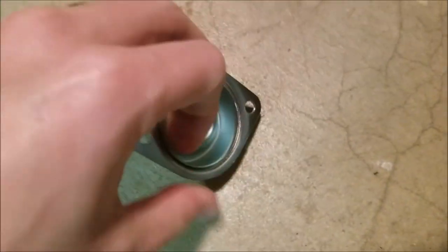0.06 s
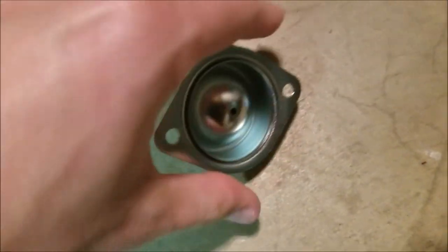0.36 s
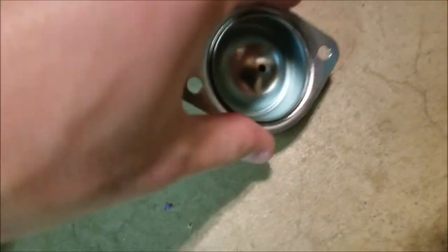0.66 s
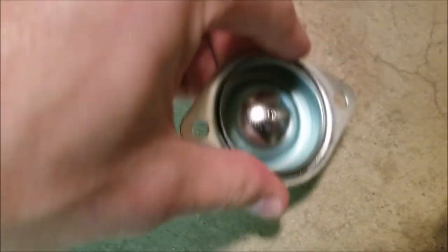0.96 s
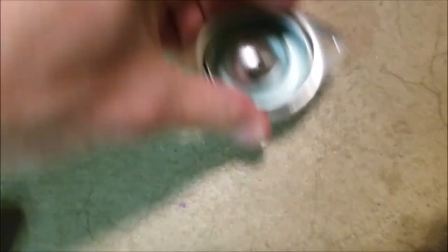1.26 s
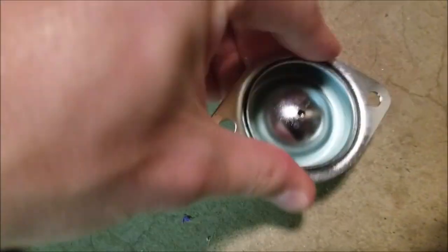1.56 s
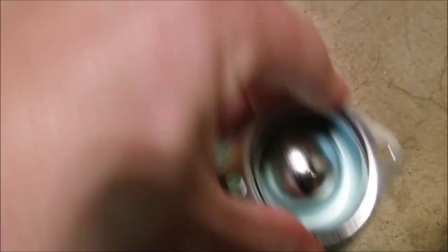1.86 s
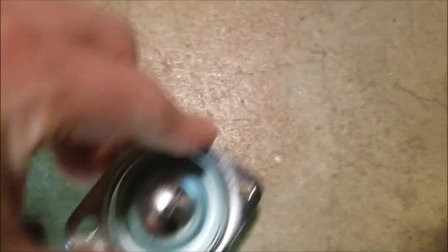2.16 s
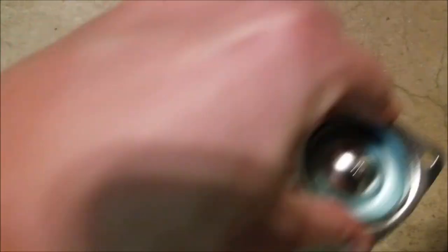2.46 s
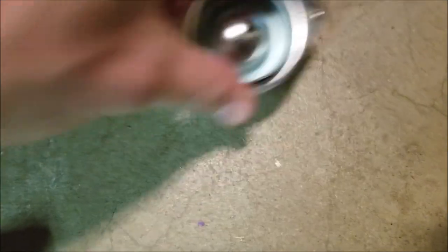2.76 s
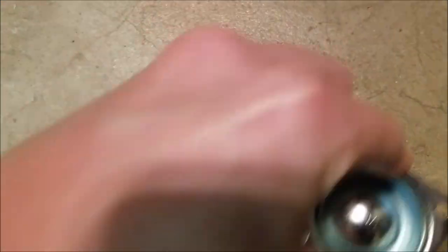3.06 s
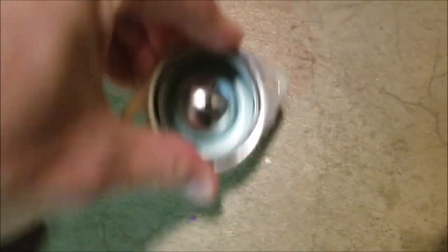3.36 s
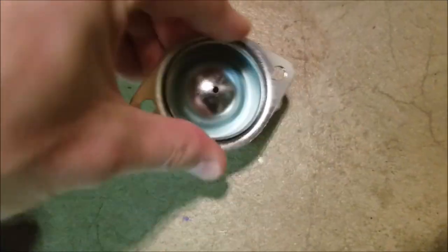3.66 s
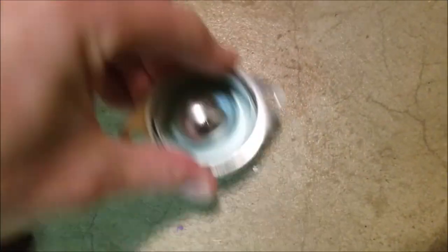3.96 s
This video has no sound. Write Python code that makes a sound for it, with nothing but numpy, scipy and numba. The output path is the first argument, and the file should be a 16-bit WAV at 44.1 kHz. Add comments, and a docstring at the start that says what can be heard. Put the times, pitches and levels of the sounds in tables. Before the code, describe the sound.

Gritty rolling and chattering of a steel ball caster pushed by hand across a concrete floor.

```python
"""Ball transfer unit on concrete

A steel ball transfer unit is pushed to and fro by hand over rough concrete, close up in a bare room.
Grit ticks through the pressed housing, the big ball chatters near 2 kHz and the small bearing balls
fizz in their cup. At pits and turns the ball knocks against its seat in a short burst of bounces.
Room rumble and a mains hum lie underneath."""
import sys
import numpy as np
from scipy import signal
from scipy.fft import rfft, irfft, next_fast_len
from scipy.io import wavfile
from numba import njit

SR = 44100
rng = np.random.default_rng(int(sys.argv[2]) if len(sys.argv) > 2 else 0)


def waveform_to_disk(signal):
    """Save audio, clipped to [-1, 1], as 16-bit WAV at the path in sys.argv[1]."""
    frames = np.transpose(np.atleast_2d(signal))
    scaled = np.clip(frames, -1, 1) * 32767
    samples = np.round(scaled).astype(np.int16)
    wavfile.write(sys.argv[1], SR, samples)


N = 176400
T = np.arange(N) / SR
FFT_SIZE = next_fast_len(2 * N, real=True)
HZ = np.arange(FFT_SIZE // 2 + 1) * SR / FFT_SIZE
BALL_HZ, BALL_LAG_S, HOUSING_LAG_S = 2170, 0.00008, 0.00004
GRIT_PER_S, GRIT_SPREAD_DB = 1200, 6
BEARING_PER_S, BEARING_SPREAD_DB = 1100, 3.5


def amp(db):
    return 10 ** (np.asarray(db) / 20)


def unit_rms(x):
    return x / np.sqrt(np.mean(x ** 2))


def unit_power(response):
    return response / np.sqrt(np.mean(abs(response) ** 2))


def pan(left_db):
    return amp(np.array([[left_db], [-left_db]]) / 2)


def right_lag(seconds):
    return np.exp(-2j * np.pi * HZ * np.array([[0], [seconds]]))


def through(x, response):
    """Filter by a frequency response."""
    return irfft(rfft(x, FFT_SIZE) * response, FFT_SIZE)[..., :N]


def colour(points):
    """Minimum-phase response of an EQ curve of (freq_hz, gain_db) points."""
    hz, db = np.array(points).T
    gain = amp(np.interp(np.log(HZ + 1), np.log(hz), db))
    cepstrum = irfft(np.log(gain), FFT_SIZE)
    cepstrum[1:FFT_SIZE // 2] *= 2
    cepstrum[FFT_SIZE // 2 + 1:] = 0
    return np.exp(rfft(cepstrum))


def resonance(hz, width_hz):
    """Band-pass response, gain 1 at the centre."""
    return 1j * HZ * width_hz / (hz ** 2 - HZ ** 2 + 1j * HZ * width_hz)


@njit
def moving_ring(x, hz, width_hz):
    """Band-pass resonance whose centre and width move; it passes unit power."""
    y = np.empty(len(x))
    band_state, low_state = 0., 0.
    for i in range(len(x)):
        tuning, damping = np.tan(np.pi * hz[i] / SR), width_hz[i] / hz[i]
        band = (band_state + tuning * (x[i] - low_state)) / (1 + tuning * (tuning + damping))
        band_state = 2 * band - band_state
        low_state += 2 * tuning * band
        y[i] = damping * band * np.sqrt(SR / np.pi / width_hz[i])
    return y


def wander(per_s):
    """Smooth random drift of unit spread."""
    knots = np.arange(0, T[-1] + 1, 1 / per_s)
    return unit_rms(np.interp(T, knots, rng.standard_normal(N)[:len(knots)]))


def contacts(per_s, spread_db):
    """Random tiny impacts of uneven strength, at unit power."""
    hits = rng.random(N) < per_s / SR
    polarity = np.sign(rng.standard_normal(N))
    strength = amp(spread_db * np.clip(rng.standard_normal(N), -2, 2))
    return unit_rms(hits * polarity * strength)


def scatter(spread_s=0.001538, far_side_s=0.000734, above_hz=3587):
    """Each patch of the shell delays its treble differently; the path round to the right is longer."""
    paths_s = rng.random(size=(2, 160)) * spread_s + np.array([[0], [far_side_s]])
    knots_hz = np.linspace(0, SR / 2, paths_s.shape[1])
    delay_s = np.array([np.interp(HZ, knots_hz, side) for side in paths_s]) * (HZ > above_hz)
    return np.exp(-2j * np.pi * np.cumsum(delay_s, axis=1) * SR / FFT_SIZE) * right_lag(HOUSING_LAG_S)


# Room tone EQ: freq_hz, gain_db
RUMBLE_EQ = [(15, -15), (28, -24), (45, -20), (64, -11), (100, -7), (190, -8), (280, -20), (450, -25.5),
             (655, -40.5), (1630, -45), (2250, -41), (2600, -38), (3000, -44), (4000, -43.5), (6400, -44),
             (8100, -70), (13800, -47), (15000, -53)]
# Fader ride of the hum: time_s, level_db
HUM_LEVELS = [(0, -51.5), (1.4, -53.5), (1.7, -54), (2.2, -65.5), (3.3, -59.5), (4, -87)]
def background(hum_hz=51.3):
    """A bed of low room rumble and a fading mains hum with a faint, steady octave."""
    mid, side = unit_rms(through(rng.standard_normal((2, N)), colour(RUMBLE_EQ)))
    rumble = amp(-55.5) * (mid + 0.41 * side * np.array([[1], [-1]]))
    hum_db = np.interp(T, *np.array(HUM_LEVELS).T)
    hum = np.sqrt(2) * amp(hum_db) * np.sin(2 * np.pi * hum_hz * T)
    octave = amp(-62) * np.sin(4 * np.pi * hum_hz * T)
    return (rumble + hum + octave) * pan(3.5)


SETTLE_DB_PER_S = 187
# Tone of the opening rattle: freq_hz, gain_db
RATTLE_EQ = [(200, -25), (500, -11.5), (900, -4.5), (1300, -0.5), (1750, 3.5), (2400, -3.5), (3500, -5.5),
             (5600, -7), (7000, -30), (9000, -29)]
def settling_rattle():
    """A rattle of the housing dies away as the fingers take hold."""
    force = contacts(GRIT_PER_S, GRIT_SPREAD_DB) * amp(-35 - SETTLE_DB_PER_S * T)
    body = unit_power(colour(RATTLE_EQ) * resonance(1600, width_hz=4300))
    ring = amp(-7) * unit_power(resonance(4210, width_hz=80))
    return through(force, (body + ring) * scatter())


# Free spins: start_s, length_s, level_db
SPINS = [(0, 0.037, -42), (0.065, 0.078, -52), (0.897, 0.056, -51)]
def bearing_whistle(pitch_hz=14270):
    """The bearing balls spin on freely and sing a thin, high whistle."""
    gate = sum(amp(db) * ((T >= start_s) & (T < start_s + length_s)) for start_s, length_s, db in SPINS)
    force = contacts(BEARING_PER_S, BEARING_SPREAD_DB) * gate
    whistle = unit_power(resonance(pitch_hz, width_hz=94) * resonance(pitch_hz, width_hz=900))
    return through(force, whistle * scatter()) * pan(2)


# Modes of the cup: pitch_hz, width_hz, level_db, pan_left_db
CUP_MODES = [(4330, 170, -7, 16), (5450, 160, -13, -18), (9550, 770, -11, -13), (12200, 130, 0.5, -16.5),
             (14750, 200, 7, -14), (14200, 93, 4, -8)]
def cup_response():
    """The cup and its small balls ring in narrow bands, each leaning to one side."""
    return sum(amp(db) * resonance(hz, width) * pan(left_db) for hz, width, db, left_db in CUP_MODES)


# Single bearing balls dropping against each other: start_s, level_db
TICKS = [(.02, -41), (.1, -36), (.14, -27.5), (.169, -30.5), (0.417, -37.5), (0.597, -33.5), (.682, -35),
         (.813, -25.5), (.819, -32.5), (1.449, -24), (2.179, -14.5), (2.392, -25), (2.745, -15),
         (2.928, -8.5), (3.615, -20)]
# Tone of the fizz and ticks: freq_hz, gain_db
BEARING_EQ = [(300, -17.5), (1500, -6), (2800, -3), (3600, -0.5), (4800, 2), (6200, 6), (7100, -2.5),
              (8100, -23), (9500, -6), (11000, -5.5), (13200, -5.5), (14500, 5), (16000, -1)]
def bearings(cup_knee_db=-50.5, cup_ratio=0.92):
    """The small balls settle, tick singly and jostle with each push in PUSHES, ringing their cup."""
    time_s, _, _, levels_db = np.array(PUSHES).T
    fizz_db = np.interp(T, time_s, levels_db, left=-120)
    # Above the knee the cup swells less than the fizz.
    cup_db = np.minimum(fizz_db, cup_knee_db + cup_ratio * (fizz_db - cup_knee_db))
    settle = amp(-35.5 - SETTLE_DB_PER_S * T)
    scratches = amp(4.5 * wander(per_s=35))
    jostle, *sides = (unit_rms(contacts(BEARING_PER_S, BEARING_SPREAD_DB) * scratches) for _ in range(3))
    ticks = np.zeros(N)
    for start_s, level_db in TICKS:
        ticks[int(start_s * SR)] += amp(level_db - 3)
    fizz_force = jostle * (amp(fizz_db - 2) + settle) + 2 * ticks
    cup_force = np.array(sides) * (amp(cup_db) + settle) + ticks
    fizz = through(fizz_force, unit_power(colour(BEARING_EQ)) * scatter()) * pan(2.5)
    return fizz + amp(-1.5) * through(cup_force, unit_power(cup_response()))


# Tone of the housing under fingers or fine grit: freq_hz, gain_db
HOUSING_EQ = [(100, -44.5), (400, -17.5), (700, -14.5), (950, -1.5), (1200, 5.5), (1500, -3.5),
              (2000, -1.5), (2500, -7.5), (2900, -10), (3500, -16), (4500, -17.5), (7000, -21),
              (16000, -51)]
# Soft touches: peak_s, level_db
TOUCHES = [(.247, -65.5), (.58, -76), (0.72, -61)]
def finger_scuffs(swell_s=0.0085):
    """Fingers brush the flange: short, dull scuffs of the housing."""
    envelope = sum(amp(db) * np.exp(-((T - peak_s) / swell_s) ** 2) for peak_s, db in TOUCHES)
    return through(rng.standard_normal(N) * envelope, unit_power(colour(HOUSING_EQ)) * scatter())


# Fader rides of grit, big ball and bearings, swelling with each push: time_s, rasp_db, ring_db, fizz_db
PUSHES = [(0.87, -100, -98.5, -81), (0.893, -54.5, -39.5, -52.5), (0.98, -65, -42.5, -49),
          (1.03, -62, -45, -47), (1.121, -63.5, -38, -54), (1.18, -83, -74, -74), (1.211, -64, -44.5, -65),
          (1.257, -47, -36, -52.5), (1.342, -32.5, -26.5, -36), (1.4, -47.5, -45, -45.5),
          (1.45, -61.5, -70, -58), (1.51, -42.5, -37, -42.5), (1.56, -41, -31, -36.5),
          (1.6, -43.5, -34, -37.5), (1.654, -59, -62, -56.5), (1.691, -38.5, -27.5, -38.5),
          (1.747, -44, -29, -33.5), (1.785, -53.5, -55, -47), (1.848, -38, -34, -51),
          (1.914, -34, -23.5, -34), (1.99, -61.5, -57, -47.5), (2.049, -56, -51, -69),
          (2.082, -43, -30, -36), (2.12, -50, -40, -47), (2.18, -44.5, -29, -47.5),
          (2.27, -42.5, -40.5, -38), (2.337, -57, -48.5, -56), (2.419, -39, -23.5, -45),
          (2.5, -40.5, -29, -42.5), (2.568, -38.5, -24, -43), (2.615, -44.5, -40, -47),
          (2.655, -47, -27.5, -46.5), (2.7, -39, -39, -33), (2.727, -48.5, -38.5, -44),
          (2.766, -41, -29.5, -37.5), (2.87, -41.5, -35.5, -39), (2.94, -37, -37, -38),
          (3.05, -37.5, -27, -40.5), (3.09, -43.5, -36, -37.5), (3.16, -49.5, -50, -50),
          (3.206, -32, -19, -45), (3.24, -39.5, -28.5, -38), (3.27, -32.5, -18.5, -37.5),
          (3.289, -42.5, -36, -35), (3.39, -52, -41, -43), (3.46, -42, -35, -45),
          (3.538, -41, -27.5, -36.5), (3.589, -61, -51, -48.5), (3.657, -38.5, -25, -28),
          (3.69, -53, -42, -41.5), (3.76, -55, -41, -62), (3.821, -37.5, -29, -41), (3.93, -59.5, -52, -45),
          (3.979, -43, -34.5, -48.5)]
# The housing's upper resonance, shifting from stroke to stroke: time_s, pitch_hz
SHELL_PITCH = [(1.3, 2780), (1.95, 2860), (2.42, 2590), (2.54, 2870), (2.65, 2670), (2.8, 2660),
               (2.95, 3400), (3.05, 2860), (3.2, 2570), (3.33, 2970), (3.5, 2770), (3.9, 2780)]
# Tone of the housing under a sharp hit: freq_hz, gain_db
CRACK_EQ = [(100, -45), (400, -16.5), (950, 8), (1500, 6.5), (2300, 2.5), (3200, 4.5), (4300, -5),
            (6000, -4.5), (7800, -34.5), (10000, -24), (14500, -9), (16000, -0.5)]
def rolling(smooth_hz=2060, smooth_width_hz=150, rough_width_hz=310, stiffen_hz_per_db=1.5):
    """Fine grit rasps and coarse grains crack through the housing while the big ball chatters."""
    time_s, rasp_db, ring_db, _ = np.array(PUSHES).T
    grit_db = np.interp(T, time_s, rasp_db, left=-120)
    load_db = np.interp(T, time_s, ring_db, left=-120)
    patches = amp(2.5 * wander(per_s=110))
    grit = unit_rms(contacts(GRIT_PER_S, GRIT_SPREAD_DB) * patches) * amp(grit_db - 1.5)
    grains = contacts(per_s=150, spread_db=3.5) * amp(grit_db - 2)
    shell_hz = np.interp(T, *np.array(SHELL_PITCH).T)
    shell = moving_ring((grit + grains) * amp(-9), shell_hz, width_hz=np.full(N, 140.))
    # The ball's contact stiffens under load, so its ring rises with its level.
    loaded_hz = BALL_HZ + stiffen_hz_per_db * np.maximum(load_db + 6, -30) + 115 * wander(per_s=30)
    # On smooth floor the ball holds one narrow note; rough floor widens it and lets it move.
    roughness = np.clip((grit_db + 57) / 21, 0, 1)
    ring_hz = smooth_hz + roughness * (loaded_hz - smooth_hz)
    ring_width_hz = smooth_width_hz + roughness * (rough_width_hz - smooth_width_hz)
    chatter = unit_rms(contacts(per_s=1000, spread_db=0.5) * patches) * amp(load_db - 6.5)
    ring = moving_ring(chatter, ring_hz, ring_width_hz)
    rasp = through(grit, unit_power(colour(HOUSING_EQ)) * scatter())
    crackle = through(grains, unit_power(colour(CRACK_EQ)) * scatter())
    return ((rasp + crackle) * pan(4)
            + through(shell, resonance(2400, width_hz=2800) * right_lag(HOUSING_LAG_S)) * pan(19)
            + through(ring, resonance(BALL_HZ, width_hz=1500) * right_lag(BALL_LAG_S)) * pan(-7.5))


# Knocks in the seat, more crack when harder: start_s, level_db, bounce_hz, length_s, hardness_db
KNOCKS = [(0.888, -27.5, 1986, 0.0047, -7), (1.004, -9.5, 1978, 0.0031, -12),
          (1.245, -29, 2270, 0.0033, -12), (1.273, -23.5, 2000, 0.0012, -3.5),
          (1.339, -20.5, 2070, 0.0041, -3), (1.474, -35.5, 2300, 0.0026, 6.5),
          (1.499, -25, 2110, 0.00049, -8), (1.574, -3.5, 2191, 0.0032, -10.5),
          (1.5907, -17.5, 2070, 0.00081, -13), (1.677, -20, 2130, 0.0011, -7),
          (1.73, -22, 2270, 0.0038, -11), (1.834, -26, 2080, .002, -15),
          (1.8832, -19.5, 1980, 0.0007, -2.5), (1.9015, -20, 2050, 0.00065, -9),
          (1.908, -16, 2050, 0.00068, -9), (1.944, -16.5, 1820, 0.0022, 3.5), (2.403, -33, 2060, 0.002, 4),
          (2.467, -15.5, 2170, 0.003, -9), (2.513, -5.5, 2207, 0.0034, -1),
          (2.57, -17.5, 2220, 0.0025, -10), (2.647, -23, 2490, 0.0046, -9.5),
          (2.777, -23.5, 2100, 0.001, -3), (2.8185, -20, 2060, 0.00084, 0.5),
          (2.9302, -31, 2003, 0.0081, 14.5), (3.034, -7, 2300, 0.0014, -34),
          (3.1066, -5.5, 2260, 0.00244, 0.5), (3.189, -19, 2010, 0.005, -22),
          (3.2069, -9.5, 2090, 0.00091, -29), (3.219, -22, 2120, 0.0015, -5),
          (3.2792, -6, 2154, 0.0028, 0.5), (3.5259, -8.5, 2030, 0.0025, -4),
          (3.6754, -4, 2170, 0.0063, -14.5), (3.965, -24, 1820, 0.0026, -16)]
def ball_knocks(max_bounces=24, first_accent=1.5, crack_decay_s=0.006):
    """The ball lands hard and bounces rapidly, pumping its ring; the first contacts crack the housing."""
    bounces, cracks = np.zeros(N), np.zeros(N)
    for start_s, level_db, bounce_hz, length_s, hardness_db in KNOCKS:
        age_s = np.arange(max_bounces) / bounce_hz
        strength = amp(level_db) * np.clip((length_s - age_s) * bounce_hz, 0, 1)
        samples = ((start_s + age_s) * SR).astype(int)
        bounces[samples] += strength * np.where(age_s == 0, first_accent, 1)
        jitter = (age_s > 0) * rng.integers(-4, 5, max_bounces)
        cracks[samples + jitter] += strength * amp(hardness_db) * np.exp(-age_s / crack_decay_s)
    ball = resonance(BALL_HZ, width_hz=730) * resonance(BALL_HZ, width_hz=1560) * SR / BALL_HZ / 2
    housing = 2 * unit_power((colour(CRACK_EQ) + amp(-13.5) * cup_response()) * scatter())
    return (through(bounces, ball * right_lag(BALL_LAG_S)) * pan(-5.5) * amp(-3)
            + through(cracks, housing) * pan(1.5) * amp(5.5))


def flange_clinks(pitch_hz=4071, t60_s=0.12):
    """Each knock leaves a brief, bright ring in the flange, louder when the contact is hard."""
    blows = np.zeros(N)
    for start_s, level_db, _, _, hardness_db in KNOCKS:
        blows[int(start_s * SR)] += amp(level_db - 23.5 + 0.25 * hardness_db)
    ring = np.sin(2 * np.pi * pitch_hz * T) * amp(-60 * T / t60_s)
    return through(blows, rfft(ring, FFT_SIZE)) * pan(7.5)


def room(dry, low_t60_s=0.31, treble_t60_s=0.24, crossover_hz=4000, build_s=0.00029, echo_s=0.014):
    """One near reflection and a short diffuse tail that dies sooner in the treble."""
    noise = rng.standard_normal((2, N))
    low = through(noise, 1 / (1 + (HZ / crossover_hz) ** 2))
    tail = low * amp(-60 * T / low_t60_s) + (noise - low) * amp(7.5 - 60 * T / treble_t60_s)
    tail *= 1 - np.exp(-T / build_s)
    echo = amp(-24.5) * np.exp(-2j * np.pi * HZ * echo_s)
    return through(dry, amp(-6.5) * unit_power(rfft(tail, FFT_SIZE)) + echo)


def scene():
    """The unit up close, its room reverb and the background bed."""
    close = rolling() + bearings() + ball_knocks() + flange_clinks()
    close = close + settling_rattle() + bearing_whistle() + finger_scuffs()
    return close + room(close) + background()


def record(dry, mic_top_hz=14430, cutoff_hz=16000):
    """The microphone rolls off steeply on top; a soft clip rounds the peaks ahead of a high cut."""
    heard = through(dry, 1 / np.sqrt(1 + (HZ / mic_top_hz) ** 200))
    rounded = heard / (1 + heard ** 6) ** (1 / 6)
    high_cut = signal.ellip(8, .2, 80, cutoff_hz, fs=SR, output="sos")
    return signal.sosfilt(high_cut, rounded)


dry = scene()
out = record(dry)
waveform_to_disk(out)
```